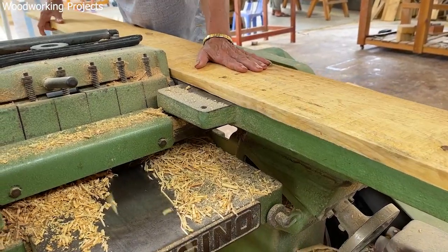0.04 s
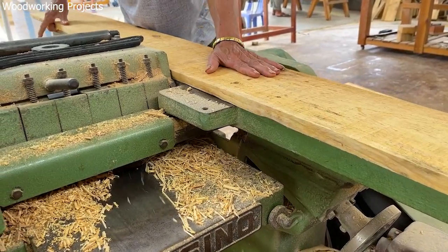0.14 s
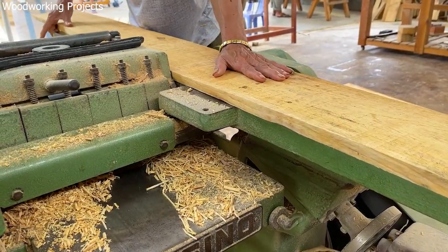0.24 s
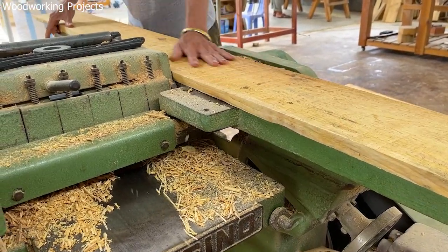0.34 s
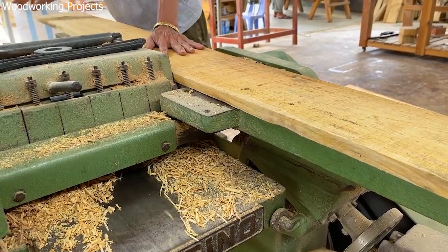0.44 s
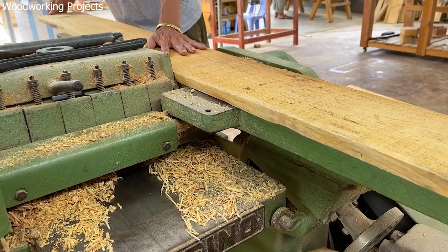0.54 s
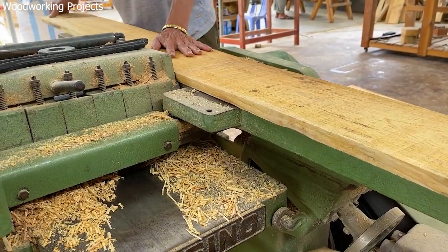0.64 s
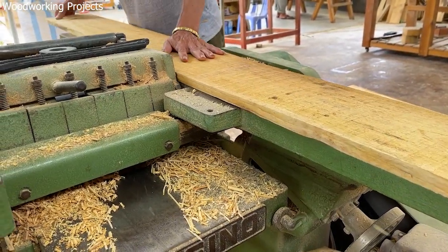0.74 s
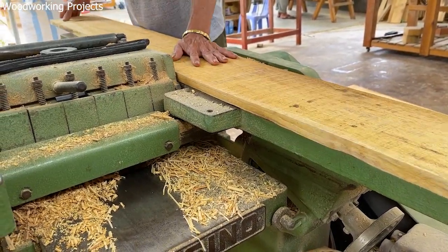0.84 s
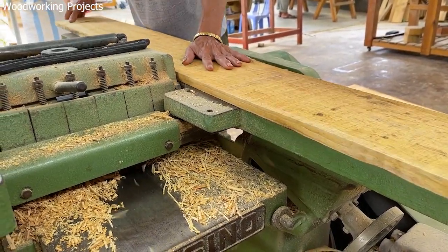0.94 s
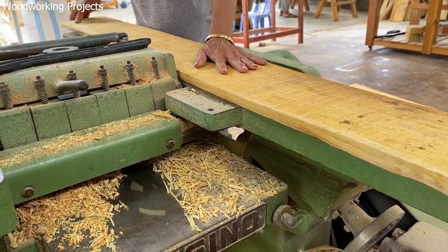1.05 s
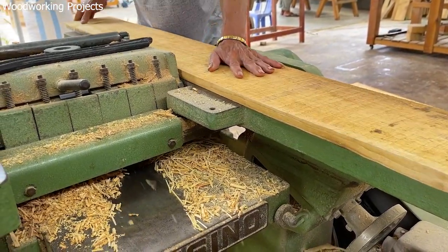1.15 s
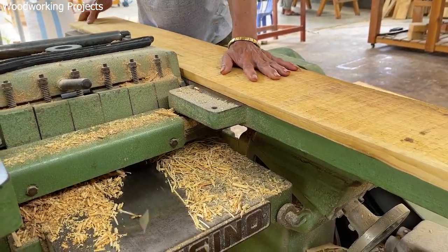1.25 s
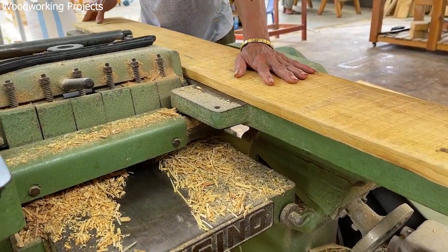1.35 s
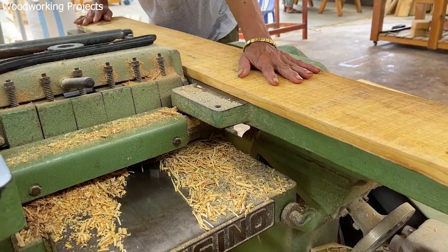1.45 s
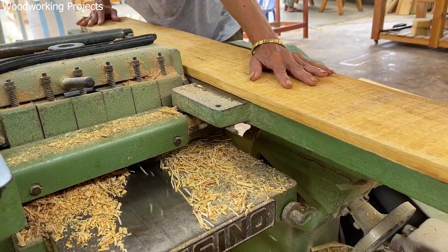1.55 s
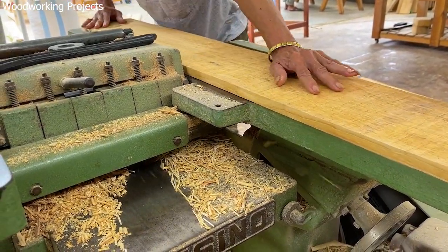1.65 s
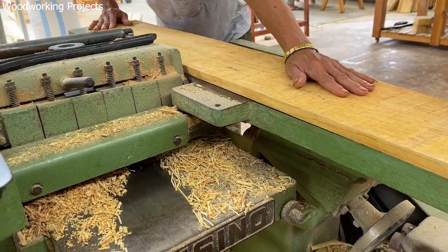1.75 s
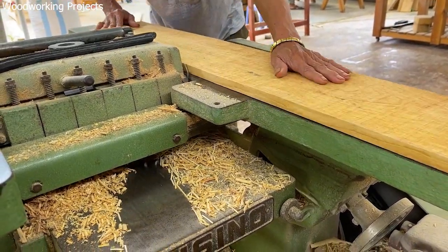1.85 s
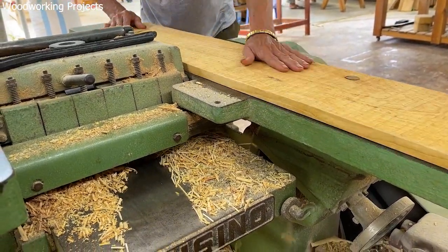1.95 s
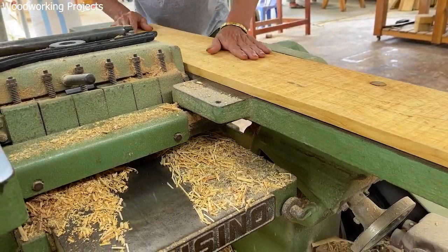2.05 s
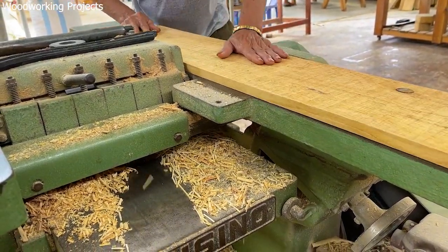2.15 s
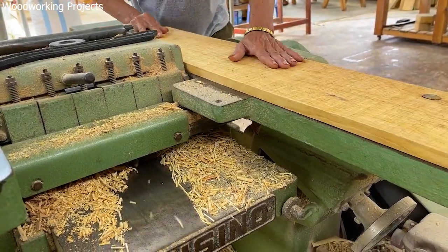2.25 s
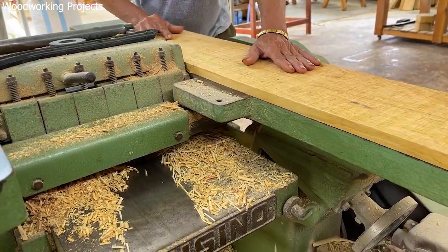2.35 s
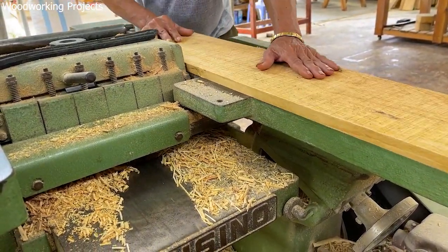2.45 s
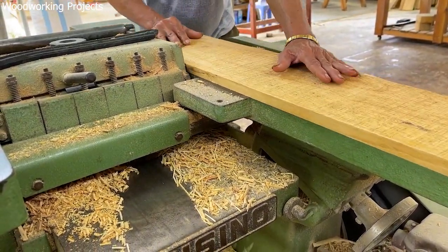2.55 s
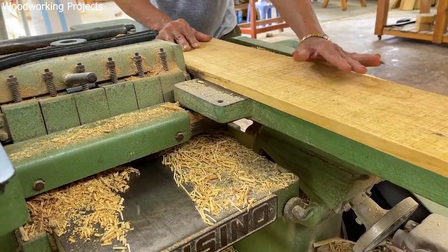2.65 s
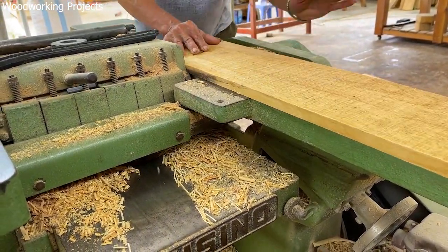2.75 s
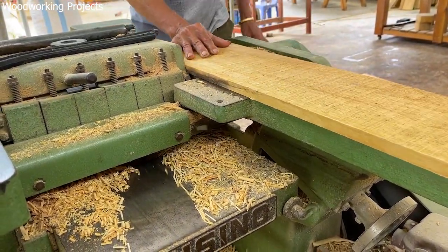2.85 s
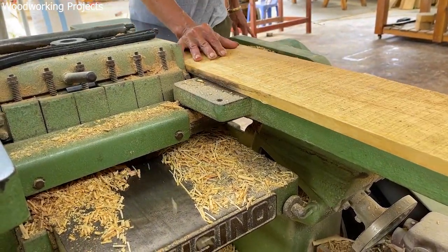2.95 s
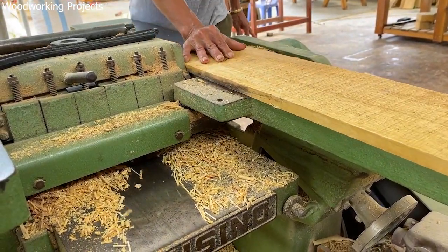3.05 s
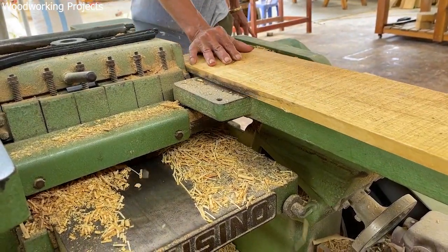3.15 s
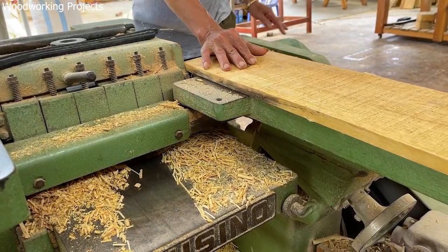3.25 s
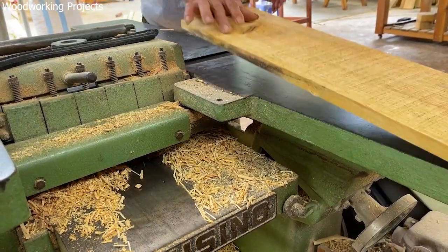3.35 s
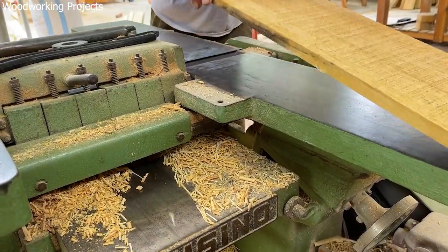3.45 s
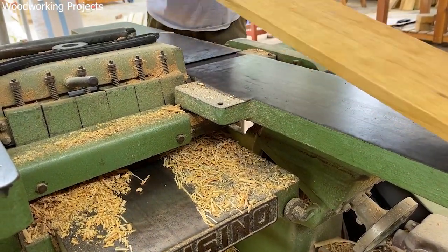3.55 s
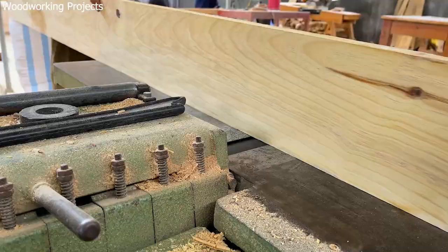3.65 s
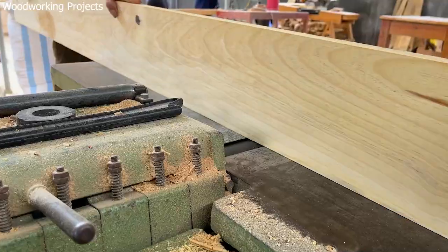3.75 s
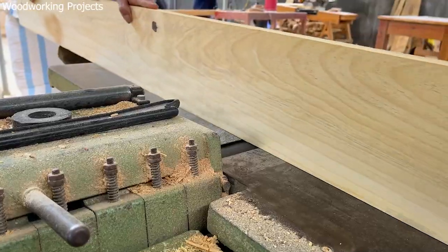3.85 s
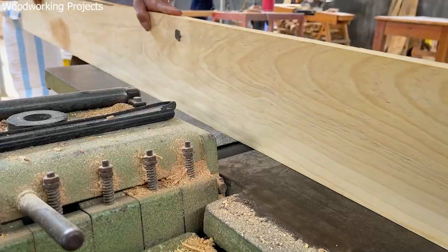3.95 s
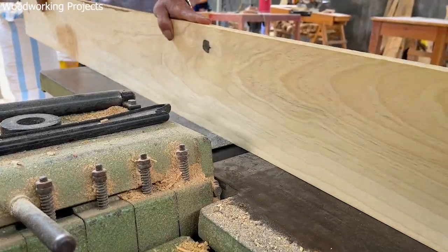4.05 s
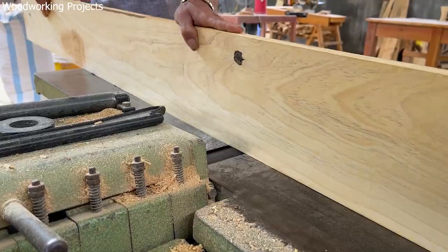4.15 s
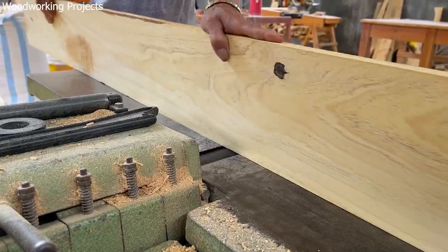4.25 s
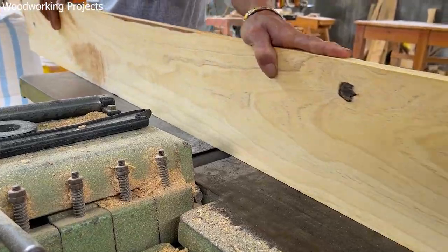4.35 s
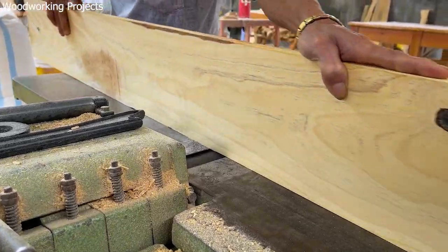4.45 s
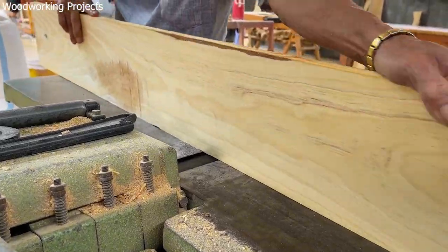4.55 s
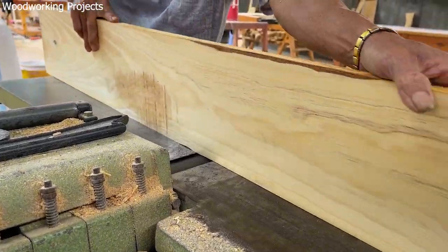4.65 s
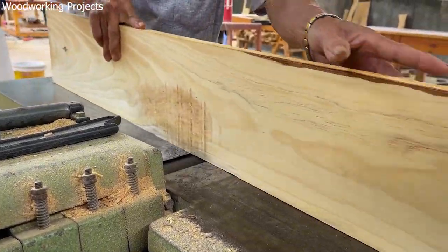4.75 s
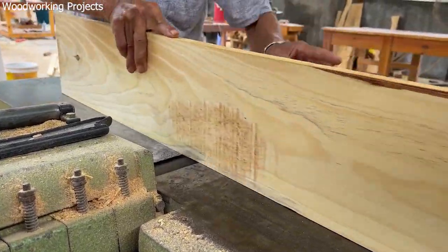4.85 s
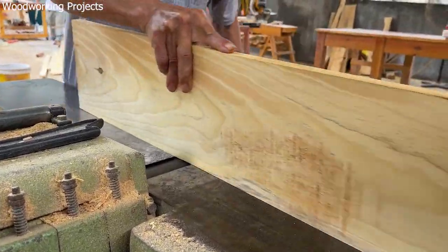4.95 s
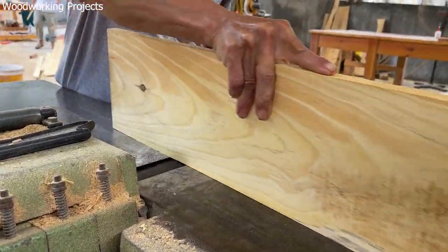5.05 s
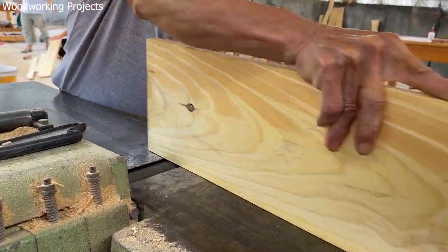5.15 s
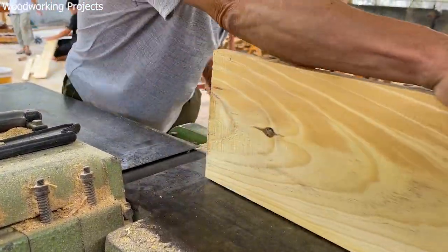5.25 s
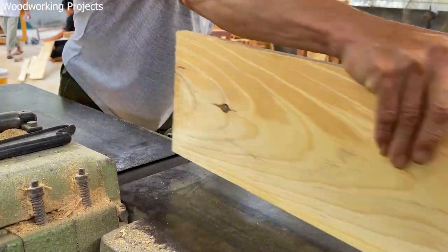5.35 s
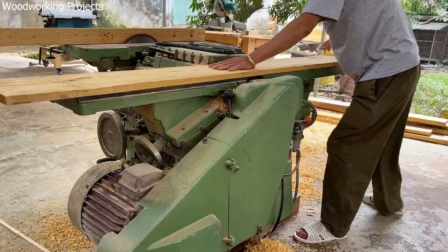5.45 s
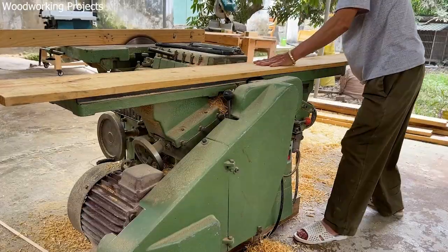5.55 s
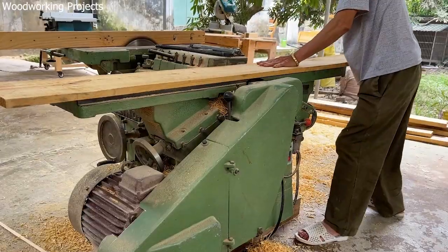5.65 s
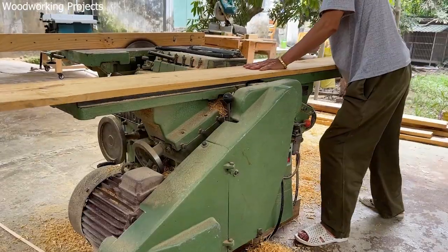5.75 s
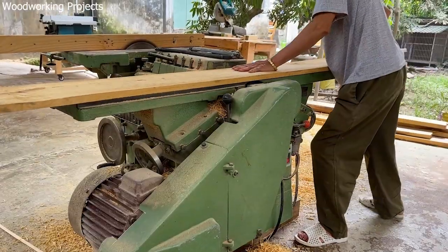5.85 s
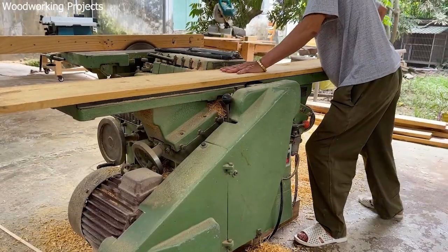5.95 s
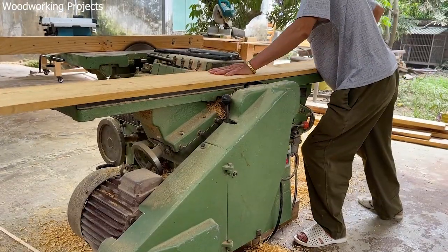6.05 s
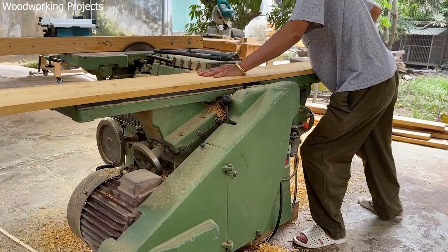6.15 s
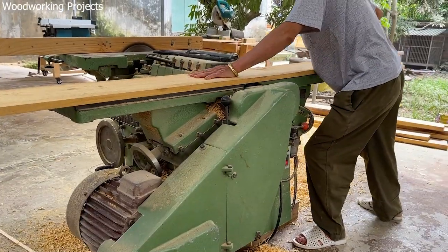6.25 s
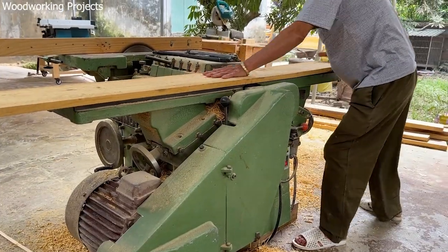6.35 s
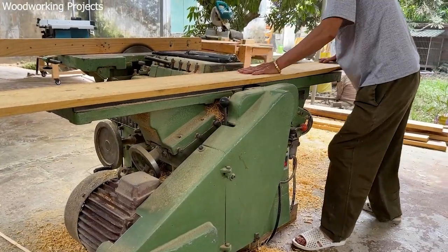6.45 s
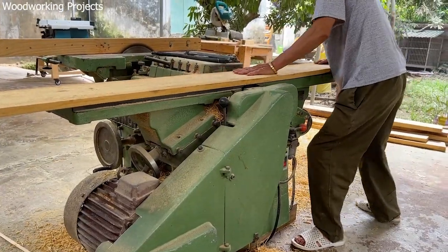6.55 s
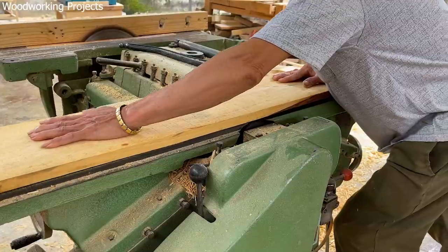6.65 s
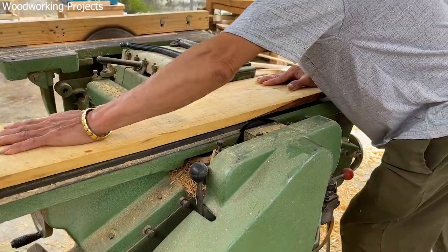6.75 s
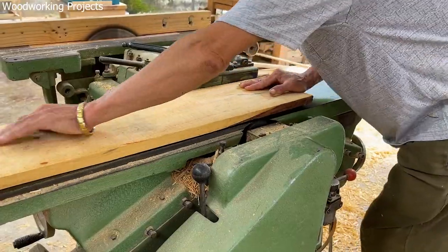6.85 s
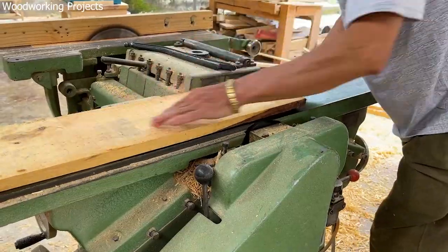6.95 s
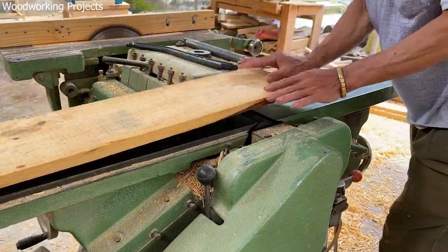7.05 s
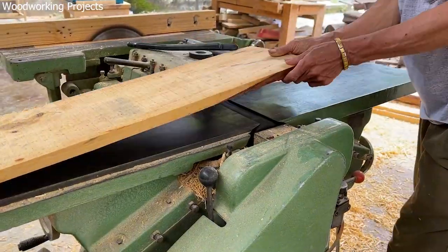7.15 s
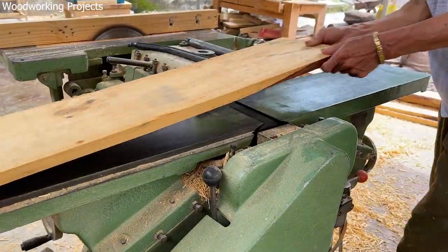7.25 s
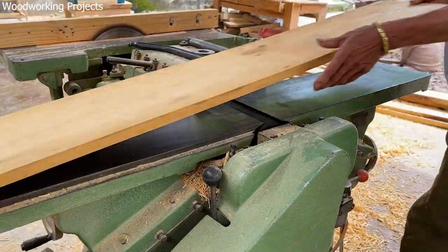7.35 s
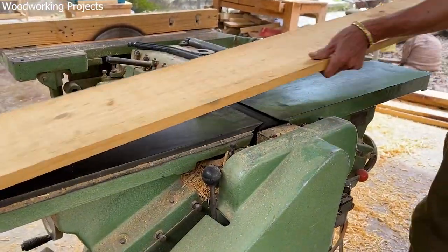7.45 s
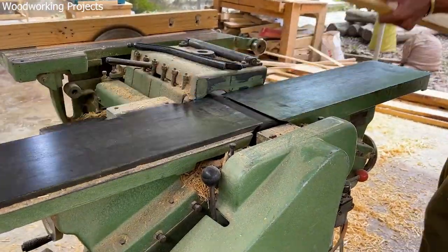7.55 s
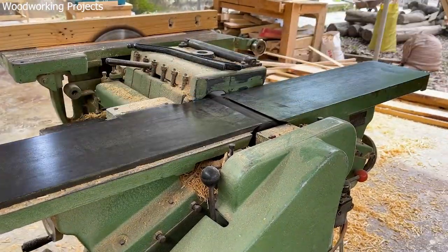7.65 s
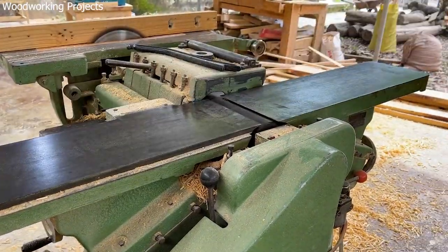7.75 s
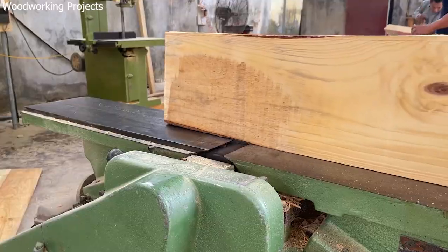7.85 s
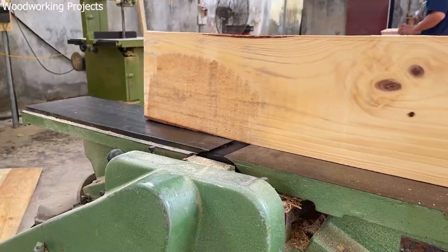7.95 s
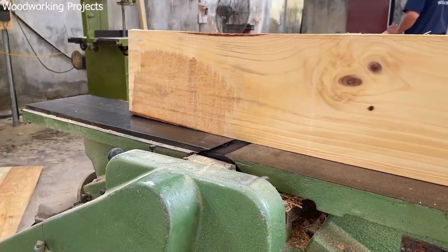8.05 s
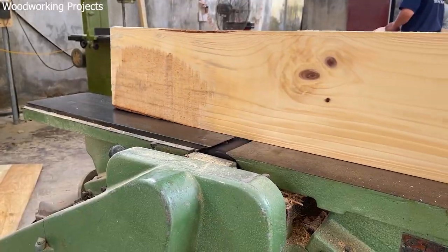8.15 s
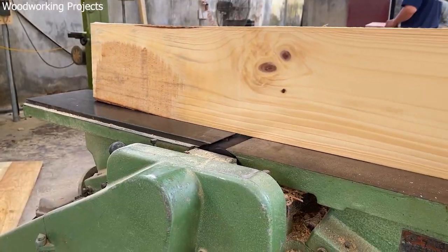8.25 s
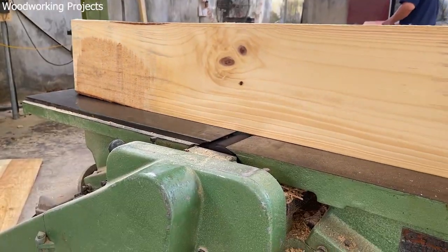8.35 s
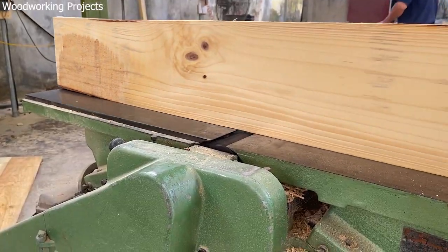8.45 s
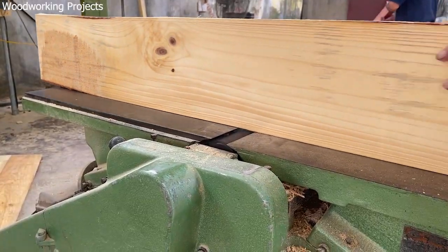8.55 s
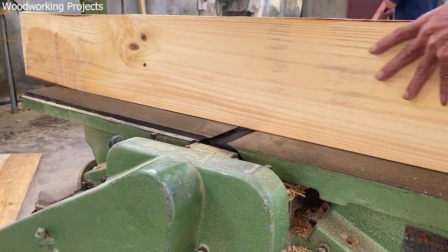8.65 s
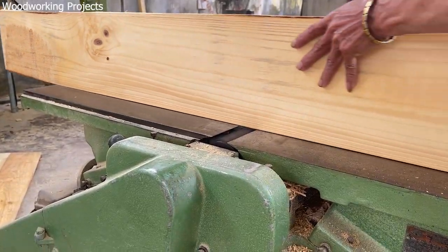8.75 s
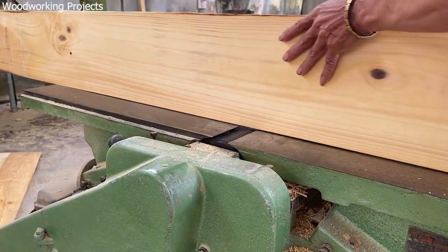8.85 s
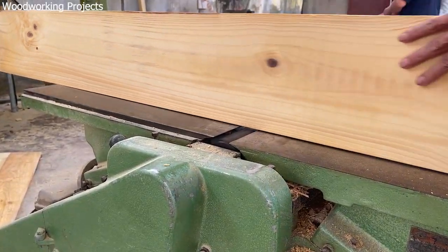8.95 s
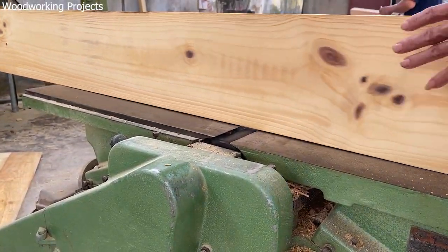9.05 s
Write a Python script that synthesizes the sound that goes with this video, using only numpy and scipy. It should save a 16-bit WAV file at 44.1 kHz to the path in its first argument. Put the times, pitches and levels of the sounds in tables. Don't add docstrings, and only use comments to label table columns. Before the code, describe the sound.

A jointer's cutter head whirs over belt rumble as wooden boards are planed in raspy, buzzing passes, with distant hammering and abrupt scene changes.

```python
import sys
import numpy as np
from scipy import signal
from scipy.fft import rfft, irfft, next_fast_len
from scipy.io import wavfile
from scipy.ndimage import uniform_filter1d, map_coordinates

SR = 44100
rng = np.random.default_rng(int(sys.argv[2]) if len(sys.argv) > 2 else 0)


def pcm_store(signal):
    levels = np.round(np.clip(np.atleast_2d(signal), -1, 1) * 32767)
    wavfile.write(sys.argv[1], SR, levels.astype(np.int16).T)


def invert_db(level):
    return 10 ** (np.asarray(level, dtype=float) / 20)


N = 401751
T = np.arange(N) / SR

# start in seconds, peak level in dB.
HAMMER = [(.302, -38.5), (.391, -36), (.472, -33), (.556, -31), (.639, -31), (.723, -33.5), (.812, -37),
          (2.447, -35), (2.546, -31), (2.642, -30.5), (2.737, -31), (2.829, -36), (2.923, -34),
          (3.015, -35.5), (3.105, -32), (3.196, -37), (3.279, -43), (3.363, -40), (3.74, -36), (3.836, -27),
          (3.936, -27.5), (4.032, -29), (4.122, -33), (4.214, -31.5), (4.304, -32), (4.399, -34.5),
          (4.481, -34), (5.519, -41), (8.447, -36)]
# centre in Hz, width in Hz, level in dB.
BENCH = [(279, 116, -1.5), (420, 164, 2), (560, 230, 0.5), (787, 143, -6.5)]
# frequency in Hz, t60 in seconds.
HALL = [(200, 0.19), (1500, 0.35), (6000, 0.29), (15000, 0.1)]

# frequency in Hz, correlation 0-1.
ALIKE = [(100, 1), (500, 0.89), (1200, 0.79), (3000, 0.41), (5500, 0.17), (9000, 0.44), (14000, 0.33)]
# frequency in Hz, level in dB.
RUMBLE = [(59, -75), (100, -25.5), (242, -14.5), (269, -17.5), (500, -14), (650, -39), (1100, -120)]
# frequency in Hz, level in dB.
RUSH = [(180, -55), (300, -23.5), (510, -13.5), (536, -8.5), (622, -4.5), (1090, -9), (1830, -5),
        (2200, -9), (2770, -6), (3380, -10.5), (6040, -16.5), (6890, -15.5), (15800, -26)]
# frequency in Hz, level in dB.
GAP = [(2200, -30), (2500, -3), (2700, 5), (2950, -4), (3300, -37)]
# frequency in Hz, level in dB.
BEARING = [(6000, -47), (6500, -3), (6800, 2), (7200, -3), (7700, -43)]
# pitch in Hz, wander in Hz, level in dB relative to the air rush.
WHINES = [(10450, 220, -25), (13100, 600, -23), (7440, 49, -22)]
# time in seconds, knife strike rate in Hz.
SPEED = [(0, 271.5), (.35, 272.5), (.45, 274.5), (.62, 274.5), (.72, 271.3), (1.4, 272.3), (1.5, 273.6),
         (1.65, 272.4), (1.9, 272.8), (2.5, 271.2), (3.2, 273.5), (3.7, 274.2), (5.1, 273.7), (5.42, 274.8),
         (5.72, 274.5), (5.8, 272.8), (6.6, 274.5), (9.11, 274.6)]
# start in seconds, strike rate wobble in Hz, phase in radians.
BELT = [
    (0, .35, 1.6),
    (3.71, 2.5, -2.15),
    (5.43, 1, -.54),
    (7.83, 1.05, -1.9),
]
# time in seconds, second tone level in dB.
WHIRR = [(0, -50), (.43, -58), (.71, -47), (1.27, -50), (2.81, -49), (2.92, -55.5), (3.6, -59.5),
         (3.8, -44), (5.02, -47.5), (5.63, -63), (5.83, -45), (6.49, -65.5), (6.65, -54), (6.85, -61),
         (7.5, -57.5), (7.84, -46.5), (8.37, -50.5), (9.11, -45.5)]
# multiple of the strike rate, level in dB relative to the air rush.
OVERTONES = [(4, -7.5), (5, -3.5), (6, -7), (7, -22), (9, -10.5), (10, -20)]
# start in seconds, rumble in dB, air rush in dB, bearing hiss in dB,
# first tone in dB, gap resonance in dB relative to the air rush.
PLACES = [
    (0, -56, -44, -63, -59, -3),
    (3.71, -60.5, -44, -47, -55.5, -6),
    (5.43, -62.5, -46.5, -57, -61, -7),
    (6.63, -64, -47.5, -58.5, -57.5, -16),
    (7.83, -65.5, -45, -54.5, -54.5, -14),
]
# time in seconds, level in dB.
OPEN = [(0, -4), (3.55, -3.5), (3.7, -1.5), (3.71, 7), (4.4, 2.5), (5.42, 0), (5.43, 2), (6.62, -0.5),
        (6.63, -0.5), (7.05, 0.5), (7.3, 3.5), (7.82, 4.5), (7.83, 10), (8.4, 2.5), (9.11, 2.5)]

# frequency in Hz, level in dB.
DRAG = [(290, -39), (500, -4), (645, -6.5), (1900, -0.5), (5000, -7.5), (7070, -13), (9000, -35.5),
        (11700, -59.5), (19800, -120)]
# start in seconds, length in seconds, level in dB, release in seconds.
DRAGS = [
    (3.615, 0.12, -42.5, 0.0039),
    (5.01, 0.14, -32.5, 0.036),
    (7.348, 0.035, -36.5, 0.027),
    (7.427, 0.062, -34, 0.018),
]
# start in seconds, peak level in dB.
TICKS = [
    (6.972, -34),
    (7.263, -36),
    (7.376, -28),
    (7.70, -34),
]
# start in seconds, peak level in dB.
SNAGS = [
    (7.3273, -36),
    (7.3483, -30),
    (7.36, -20),
    (7.4281, -22),
    (7.4735, -26),
]

# start in seconds, end in seconds, centre in Hz, width in Hz, level in dB.
SINGING_FACE = [(0, .33, 1090, 150, -50), (0, .33, 5900, 900, -44), (.663, 1.145, 1365, 150, -43),
                (.66, .95, 5200, 900, -36), (.68, .9, 2180, 150, -43), (.68, 1.15, 3000, 300, -43),
                (1.12, 1.48, 3940, 400, -41), (1.15, 1.48, 5200, 250, -42), (1.4, 2.25, 3000, 180, -43),
                (1.62, 2, 2590, 400, -41), (1.6, 2.1, 3680, 400, -42), (1.9, 3, 1905, 150, -45),
                (1.75, 2.3, 1362, 150, -48), (2.25, 2.7, 3900, 400, -39), (2.3, 2.6, 5100, 600, -39),
                (2.46, 2.8, 5400, 1000, -37.5), (2.45, 3, 3260, 250, -41), (2.62, 2.97, 4100, 700, -36.5),
                (2.4, 2.95, 900, 300, -46), (1.42, 2, 2180, 150, -49)]
SINGING_EDGE = [(3.71, 5.22, 1370, 150, -41), (3.71, 5.2, 1644, 150, -44), (4.15, 5.22, 1916, 150, -43),
                (3.71, 4.2, 2190, 150, -45), (3.9, 4.25, 2600, 400, -39), (4.64, 4.95, 2500, 250, -41),
                (3.71, 4.25, 3270, 200, -38), (4.35, 5.2, 3270, 200, -37), (3.71, 5.2, 3010, 150, -42),
                (3.71, 4.22, 3830, 160, -41), (4.4, 5.2, 3830, 160, -44), (3.71, 4.3, 4390, 160, -40),
                (4.3, 5.22, 4390, 160, -43), (4.45, 5.1, 5900, 700, -42), (3.71, 4.6, 6000, 900, -40)]
SINGING_FAR = [(5.72, 6, 1095, 150, -40), (5.72, 6.2, 1420, 300, -37), (5.74, 6.34, 1915, 150, -40),
               (5.74, 6.2, 2460, 150, -37.5), (5.74, 6.2, 3400, 400, -41), (5.74, 6.2, 4250, 500, -41),
               (5.74, 6, 5900, 500, -40), (6, 6.33, 5300, 500, -45), (6.63, 6.82, 2800, 450, -45)]
SINGING_NEAR = [(7.81, 7.95, 823, 150, -43), (7.81, 8, 1500, 500, -44), (7.81, 8.33, 3015, 150, -44),
                (7.81, 7.95, 4670, 200, -46), (7.9, 8.82, 4670, 150, -54), (7.86, 8, 5900, 400, -45),
                (8.03, 8.58, 1097, 100, -44), (8.6, 9.11, 1097, 100, -50), (8, 9.11, 1645, 100, -52),
                (8.1, 8.3, 2470, 150, -51), (8.3, 8.72, 2745, 120, -48), (8.33, 8.8, 6035, 200, -45),
                (8.45, 8.74, 6000, 260, -39), (8.4, 8.72, 4930, 150, -54), (8.15, 8.42, 9860, 400, -42),
                (8.42, 8.6, 10300, 900, -47), (8.61, 8.72, 9800, 500, -46), (7.83, 7.94, 8200, 900, -42)]

# time in
# seconds, pressure level in dB, brightness in dB.
END_OF_FACE = [
    (0.0, -30, 1.5),
    (0.27, -35, -8),
    (0.31, -37, -12.5),
]
LONG_FACE = [(0.66, -33.5, 0), (0.702, -24.5, -3.5), (0.954, -34.5, -0.5), (0.972, -30.5, -2.5),
             (1.206, -35, -2), (1.29, -34.5, -3.5), (1.384, -33.5, -6), (1.43, -36.5, -11),
             (1.529, -39, -7),
             (1.56, -35, -1), (1.582, -32, -5), (1.926, -32.5, -7), (2.118, -34, -3), (2.526, -29, -5),
             (2.714, -30, -5), (2.846, -32, -7), (2.984, -32.5, 1.5), (3.205, -30.5, 2)]
EDGE = [(3.71, -33, -3), (3.718, -37.5, -7), (3.994, -26.5, -6.5), (4.168, -35.5, -2), (4.598, -34, -9.5),
        (4.71, -28.5, -14.5), (4.746, -35, -6.5), (5.136, -27.5, -8), (5.195, -34, -12)]
FAR_FACE = [(5.731, -33.5, 3), (5.746, -27.5, 1), (5.8, -25.5, -4), (5.996, -29, -4), (6.181, -32, -6),
            (6.192, -36, -1), (6.286, -31, -7), (6.33, -36.5, -7)]
BITE = [
    (6.545, -48, -5),
    (6.553, -44.5, 2),
    (6.615, -24.5, -9),
]
RUN_OUT = [
    (6.629, -28, -4),
    (6.634, -40, -6),
    (6.78, -44, -10),
]
NEAR_EDGE = [(7.83, -28.5, -11), (7.846, -28, -7.5), (7.94, -33, -7), (8.032, -44.5, 7), (8.242, -35, -8),
             (8.41, -42, 3), (8.68, -40.5, 0), (8.72, -44, -11), (8.79, -55, -12)]
PASSES = [END_OF_FACE, LONG_FACE, EDGE, FAR_FACE, BITE, RUN_OUT, NEAR_EDGE]
# frequency in Hz, level in dB.
BOARDS = [
    [(590, -41), (1000, -12), (2070, -9), (2550, -7), (4440, 1), (5790, 6.5), (11400, -8), (13000, -4),
     (15800, -13.5)],
    [(590, -8), (1000, -23.5), (1190, -1.5), (1370, -10.5), (1480, -12.5), (1870, -8.5), (2050, -9.5),
     (5210, -3), (7810, -16.5), (15800, -24.5)],
    [(590, -28), (1000, -5), (1350, -3), (2790, 5), (3320, 1), (4490, -6.5), (4980, -6.5), (6420, -8),
     (8470, -18.5), (15800, -25.5)],
    [(590, -39), (1000, -10), (1380, -9), (1520, -4), (2170, -4.5), (2490, -1), (2790, 0), (5590, 1.5),
     (7460, -13), (15800, -25)],
    [(590, -34), (1000, -10), (1220, -10), (4190, 4), (15800, -19)],
    [(590, -49), (1000, -11), (1080, 2), (2020, -10), (2760, -2), (3320, -14), (15800, -40)],
    [(590, -20), (1000, -9), (1890, -24), (3070, -22), (4190, -10.5), (4590, -16), (6060, -5), (7120, -9),
     (10100, 1), (15800, -8)],
]
# unevenness of opposite knives in dB, tearing noise share 0-1, left-side treble
# lift in dB, path flicker 0-1, chatter in dB.
KNIVES = [(4, .11, 4, .3, 0), (1.5, .045, 3, .15, 0), (2.5, .035, 3, .25, .5), (2.5, .1, 1.5, .6, 2.2),
          (1, .1, 1.5, .4, 0), (2.5, .09, 1.5, .4, 0), (2.5, .055, .5, .3, .5)]
# board thud, rasp, edge and chip spray in dB relative to
# the pressure, lift-off in seconds.
BALANCE = [(-17, -5, -7.5, -3.5, .055), (-17, -8, -6, -3, .035), (-17, -8, -2.5, -5.5, .05),
           (-12.5, -6.5, -5.5, -6, .08), (-10, -5.5, -4.5, -4, 0.0038), (-10, -8, -2.5, 0, 0.11),
           (-17, -11, -7.5, 1, .05)]
BANDS_HZ = [1000, 2500, 5300, 10000]
# time in seconds, extra unevenness in dB.
ROCKING = [(1.2, 0), (1.27, 5), (1.42, 5), (1.5, 0), (2.84, 0), (2.92, 8), (3.2, 8), (3.3, 0)]
# time in seconds, delay in ms, strength.
UNDERSIDE = [
    (2.1, .8, 0),
    (2.3, .79, .75),
    (2.9, .69, .75),
    (3.02, .68, 0),
]

# start in seconds, end in seconds.
SPLICES = [
    (3.702, 3.7095),
    (5.42, 5.428),
    (6.6205, 6.628),
    (7.8205, 7.829),
]


def unit(x):
    return x / np.sqrt(np.mean(x ** 2) + 1e-20)


def along(points, hz):
    f, v = np.transpose(points)
    return np.interp(np.log(hz + 1), np.log(f + 1), v)


def curves(rows, t=T):
    s, *cols = np.transpose(rows)
    return [np.interp(t, s, c) for c in cols]


def steps(rows):
    s, *cols = np.transpose(rows)
    row = np.clip(np.searchsorted(s, T, "right") - 1, 0, None)
    return [c[row] for c in cols]


def wobble(rate, size=N, at=None):
    grid = np.arange(0, size + 32, 32)
    knots = rng.standard_normal(int(size * rate / SR) + 4)
    smooth = map_coordinates(knots, [grid * rate / SR], mode="nearest")
    return np.interp(np.arange(size) if at is None else at, grid, smooth)


def filtered(x, response):
    length = x.shape[-1]
    m = next_fast_len(length + 8192)
    return irfft(rfft(x, m) * response(np.fft.rfftfreq(m, 1 / SR)), m)[..., :length]


def patches(x, patchy_db, bins=5, frames=10):
    z = signal.stft(x, nperseg=512)[2]
    field = uniform_filter1d(rng.standard_normal(z.shape[1:]), bins, 0)
    field = uniform_filter1d(field, frames, 1)
    return signal.istft(z * invert_db(patchy_db * unit(field)), nperseg=512)[1][:, :x.shape[1]]


def pulses(at, size, length):
    taps = np.floor(at)[..., None] + np.arange(-5, 7)
    offset = taps - at[..., None]
    shape = np.sinc(offset) * np.cos(np.pi * offset / 13) ** 2
    where = np.clip(taps, 0, length - 1).astype(int)
    return np.bincount(where.ravel(), (size[..., None] * shape).ravel(), length)


def tail(wet_db):
    hz, t, z = signal.stft(rng.standard_normal((2, SR // 4)), SR, nperseg=256)
    decay = invert_db(-60 * t / along(HALL, hz)[:, None])
    late = signal.istft(z * decay, SR, nperseg=256)[1]
    late = invert_db(wet_db) * (2.95 * late[0] + 0.5 * late) / np.linalg.norm(late[0])
    late[:, 0] += 1
    return late


def hammer():
    clack_db = 2.5
    out, t = np.zeros((2, N + SR)), np.arange(4096) / SR

    def wood(f):
        return sum((-1) ** k * invert_db(db) * 1j * f * w / (c * c - f * f + 1j * f * w)
                   for k, (c, w, db) in enumerate(BENCH))

    band = signal.butter(2, [900, 4500], "bandpass", fs=SR, output="sos")
    for s, db in HAMMER:
        push, grit = rng.standard_normal((2, len(t)))
        push = .1 * push * invert_db(-60 * t / .04)
        push += (t == 0) - 1.2 * (t == t[190]) + .6 * (t == t[700])
        thud = filtered(push, lambda f: wood(f) * f ** 4 / (f ** 4 + 200.0 ** 4))
        clack = signal.sosfilt(band, grit) * invert_db(-60 * t / .15) * (1 - np.exp(-t / .004))
        blow = thud / abs(thud).max() + invert_db(clack_db) * clack
        heard = signal.fftconvolve(blow[None], tail(wet_db=-16), axes=1)
        out[:, round(s * SR):][:, :heard.shape[1]] += invert_db(db) * heard
    return out[:, :N] * invert_db([[-1.3], [1.3]])


def rush(spectrum, patchy_db):
    pair = patches(rng.standard_normal((2, N)), patchy_db)

    def mid_side(hz):
        turn = np.arccos(np.clip(along(ALIKE, hz), -1, 1)) / 2
        return invert_db(along(spectrum, hz)) * [np.cos(turn), np.sin(turn)]

    mid, side = filtered(pair, mid_side)
    return unit(np.array([mid + side, mid - side]))


def strikes():
    belt_hz = 18.505
    (hz,), (depth_hz, phase) = curves(SPEED), steps(BELT)
    hz = hz + depth_hz * np.cos(2 * np.pi * belt_hz * T + phase) + .2 * wobble(40)
    return np.cumsum(hz) / SR


def idling(count):
    whirr_mid_db = -41.5
    (second_db,), (open_db,) = curves(WHIRR), curves(OPEN)
    rumble_db, air_db, bearing_db, first_db, gap_db = steps(PLACES)
    rumble_db = rumble_db + 1.73 * open_db
    air_db = air_db + open_db
    swell_db = second_db - whirr_mid_db
    first_db = first_db + 1.22 * open_db + 0.17 * swell_db
    third_db = whirr_mid_db - 4 + 1.05 * swell_db

    def tone(k):
        phase = 2 * np.pi * k * count + rng.uniform(0, 6.83)
        return np.sqrt(2) * invert_db(2.14 * wobble(8)) * np.sin(phase)

    whistle = invert_db(first_db) * tone(1) + invert_db(second_db) * tone(2) + invert_db(third_db) * tone(3)
    whistle += invert_db(air_db - 11) * sum(invert_db(db) * tone(k) for k, db in OVERTONES)
    for hz, wander_hz, db in WHINES:
        pitch_hz = hz + wander_hz * wobble(3.2) + 60 * wobble(200)
        whistle += invert_db(air_db + db + 1.7 * wobble(5.5)) * np.sin(2 * np.pi * np.cumsum(pitch_hz) / SR)

    air = invert_db(air_db + .7 * wobble(6)) * rush(RUSH, patchy_db=1.1)
    air *= 1 + .15 * np.cos(2 * np.pi * count)
    air += invert_db(air_db + gap_db + 2 * wobble(30)) * rush(GAP, patchy_db=.8)
    air += invert_db(bearing_db + 2 * wobble(5)) * rush(BEARING, patchy_db=1.5)
    rumble = invert_db(rumble_db + 0.14 * wobble(2.4)) * rush(RUMBLE, patchy_db=0.5)
    return whistle * invert_db([[-.8], [.8]]) + rumble + air


def scrape():
    def stroke(start, length, db, release):
        rise = 250 * np.clip(start - T, 0, 1)
        swell = 2 * np.clip((T - start) / length - 1, -1, 0)
        fall = 16 * np.clip((T - start - length) / release, 0, 9)
        return invert_db(db - rise + swell - fall)

    clumps = invert_db(1.7 * wobble(40) + 1.8 * wobble(300))
    drag = rush(DRAG, patchy_db=2)
    grit = unit(np.diff(drag, 2, prepend=0, append=0))
    out = sum(stroke(*row) for row in DRAGS) * unit(clumps) * (drag + invert_db(-13) * grit)
    t = np.arange(1024) / SR
    for s, peak_db in TICKS:
        tick = invert_db(peak_db - 12 - 60 * t / .03) * rng.standard_normal((2, len(t)))
        out[:, round(s * SR):][:, :len(t)] += tick
    snags = np.zeros((2, N))
    for s, peak_db in SNAGS:
        catch = rng.standard_normal(len(t)) + .4 * rng.standard_normal((2, len(t)))
        snags[:, round(s * SR):][:, :len(t)] += invert_db(peak_db - 10 - 60 * t / 0.016) * catch
    return out + filtered(snags, lambda hz: 2 * invert_db(along(DRAG, hz)))


def knives(count, uneven_db):
    whole = np.arange(np.ceil(count[0]), count[-1])
    jitter, chance = rng.standard_normal((2, len(whole)))
    at = np.interp(whole, count, np.arange(len(count))) + .2 * jitter
    nearest = np.clip(at, 0, len(count) - 1).astype(int)
    size_db = np.broadcast_to(uneven_db, count.shape)[nearest] * (whole % 2 - .5)
    size_db = size_db + .5 * np.cos(np.pi * whole / 2) + .5 * chance
    return at, invert_db(size_db)


def singing(count):
    noise_share = .08
    out = np.zeros((2, N))
    for start, end, centre_hz, width, db in SINGING_FACE + SINGING_EDGE + SINGING_FAR + SINGING_NEAR:
        a, b = int(start * SR), int(end * SR)
        mode = lambda f: (1j * f * width / (centre_hz ** 2 - f * f + 1j * f * width)) ** 2
        ring = unit(filtered(pulses(*knives(count[a:b], 2.6), b - a), mode))
        fibres = unit(filtered(rng.standard_normal(b - a), mode))
        ring = np.sqrt(1 - noise_share) * ring + np.sqrt(noise_share) * fibres
        level_db = db + 1.6 * wobble(13, size=b - a) + 2.2 * wobble(45, size=b - a)
        ring *= -invert_db(level_db) * signal.windows.tukey(b - a, .4)
        out[:, a:b] += [ring, np.roll(ring, rng.choice([-2, 2]))]
    return out


def paths(at, size, length, flicker, start, count=12):
    def drift(rate):
        return np.array([wobble(rate, size=length, at=at) for _ in range(count)])

    echo = .42
    lag_s = np.geomspace(.00008, .009, count)[:, None] * (1 + .11 * drift(2))
    sway = .4 * rng.choice([-1, 1], (count, 1)) + .6 * drift(5) + flicker * drift(25)
    strength = echo * invert_db(-60 * lag_s / .06) * sway
    strength[0], lag_s[0] = -.9, 0
    delay_ms, below = curves(UNDERSIDE, (start + at) / SR)
    strength[1], lag_s[1] = -below, delay_ms / 1000
    skew_s, lean = .00002 * drift(1.5), .12 * drift(3)
    ears = [pulses(at + (lag_s + side * skew_s) * SR, size * strength * (1 + side * lean), length)
            for side in (1, -1)]
    return unit(np.array(ears))


def tearing_fibres(count):
    fibres = unit(rng.standard_normal((2, len(count))) * (.2 + np.exp(-5 * (count % 1))))
    fibres = fibres - .5 * np.diff(fibres, 2, prepend=0, append=0)
    return .85 * fibres + .4 * fibres[::-1]


def cutting(count):
    lowest_hz, lift_off_db = 900, -46
    chatter_hz = 32
    bright_share = [-0.51, -0.62, -0.19, 0.49]
    out = np.zeros((2, N))
    for stroke, balance, board, knife in zip(PASSES, BALANCE, BOARDS, KNIVES):
        *under_db, off_s = balance
        uneven_db, tearing, lift_db, flicker, chatter_db = knife
        rows = list(stroke) + [np.add(stroke[-1], (off_s, lift_off_db, 0))]
        a, b = int(rows[0][0] * SR), int(rows[-1][0] * SR)
        bites = knives(count[a:b], uneven_db + curves(ROCKING, T[a:b])[0])
        sound = np.sqrt(1 - tearing) * paths(*bites, b - a, flicker, a)
        sound = sound + np.sqrt(tearing) * tearing_fibres(count[a:b])
        sound = patches(sound, 2.4, bins=4, frames=16)

        def colour(hz):
            lean_db = along([(1000, -1.4), (5500, -1.9), (8000, lift_db)], hz)
            return (hz > lowest_hz) * invert_db(np.outer([.5, -.5], lean_db)) * invert_db(along(board, hz))

        pressure_db, bright_db = curves(rows, T[a:b])
        for k in range(4):
            region = list(zip(BANDS_HZ, np.eye(4)[k]))
            part = filtered(sound, lambda hz: colour(hz) * along(region, hz))
            slow_rms = np.sqrt(abs(uniform_filter1d(np.mean(part ** 2, 0), 4000)) + 1e-12)
            db = pressure_db + under_db[k] + bright_share[k] * (bright_db - bright_db.mean())
            chatter = chatter_db * np.cos(2 * np.pi * chatter_hz * T[a:b] + 1.5 * k)
            out[:, a:b] += part / slow_rms * invert_db(db + 1.1 * wobble(18, size=b - a) + chatter)
    return out


def scene():
    count = strikes()
    cut = cutting(count) + singing(count)
    hall = signal.fftconvolve(cut, tail(wet_db=-22), axes=1)[:, :N]
    return hall + idling(count) + hammer() + scrape()


def roll_off(x):
    return signal.sosfilt(signal.butter(12, 16830, fs=SR, output="sos"), x)


def record(dry):
    top, low_hz, top_hz = .36, 115, 15950
    dry = dry / (1 + abs(dry / top) ** 3) ** (1 / 3)
    dry = filtered(dry, lambda hz: (hz < top_hz) / np.sqrt(1 + (low_hz / (hz + 1)) ** 5))
    for a, b in SPLICES:
        dry = dry * np.clip(np.maximum(a - T, T - b) / .0015 + .5, .01, 1)
    return roll_off(dry)


dry = scene()
out = record(dry)
pcm_store(out)
```